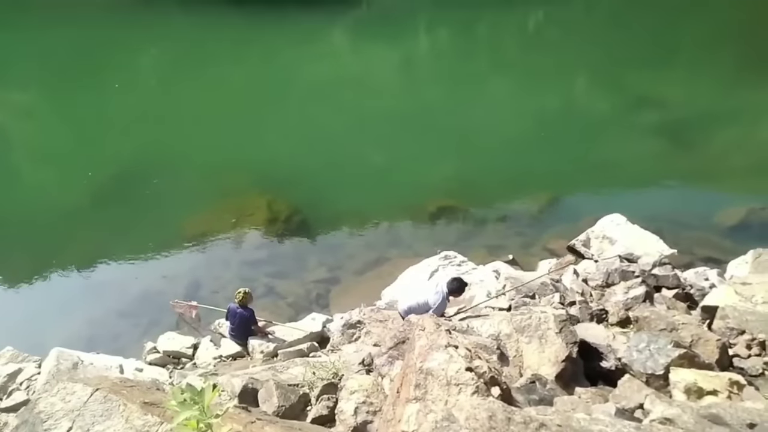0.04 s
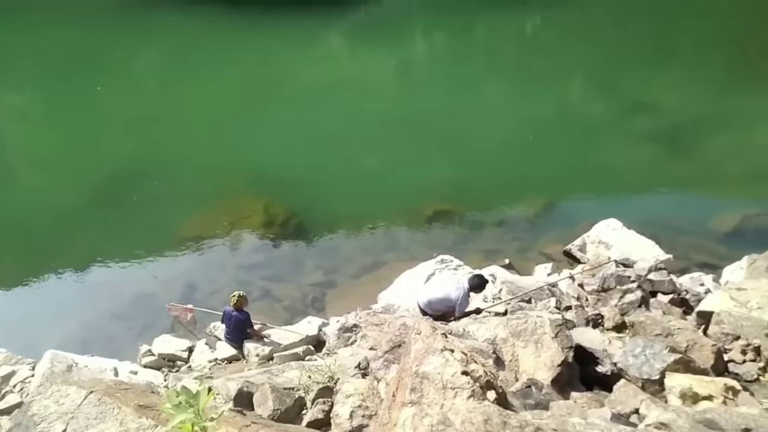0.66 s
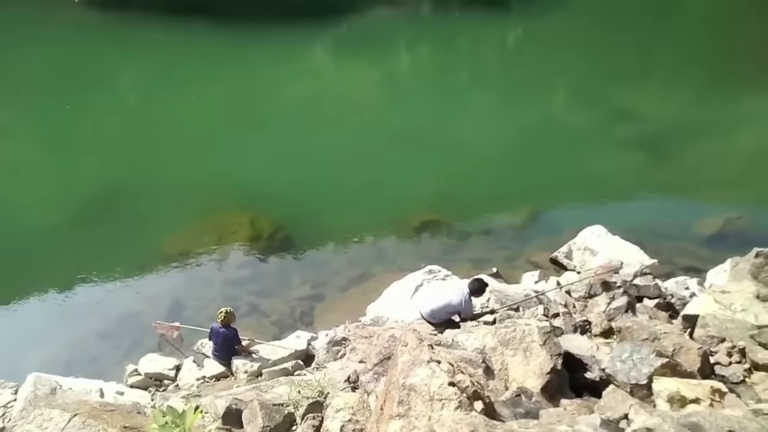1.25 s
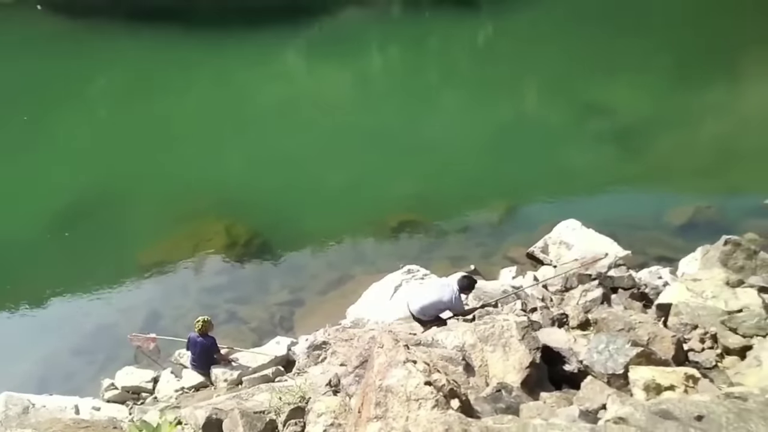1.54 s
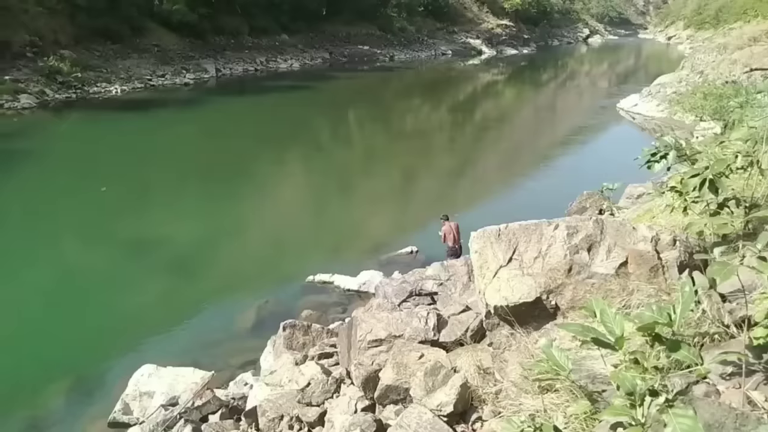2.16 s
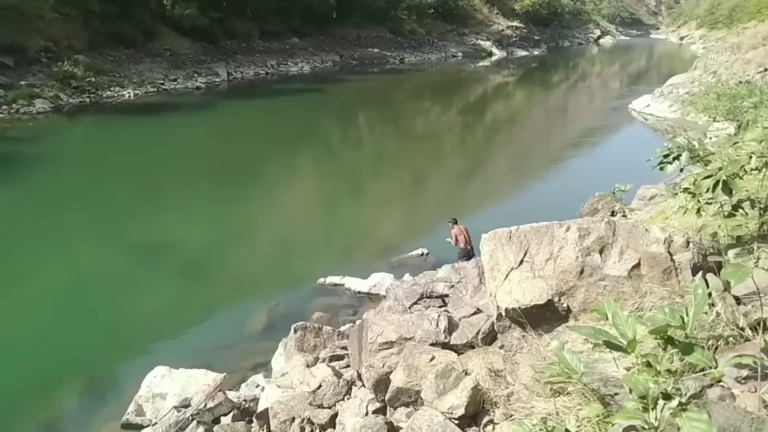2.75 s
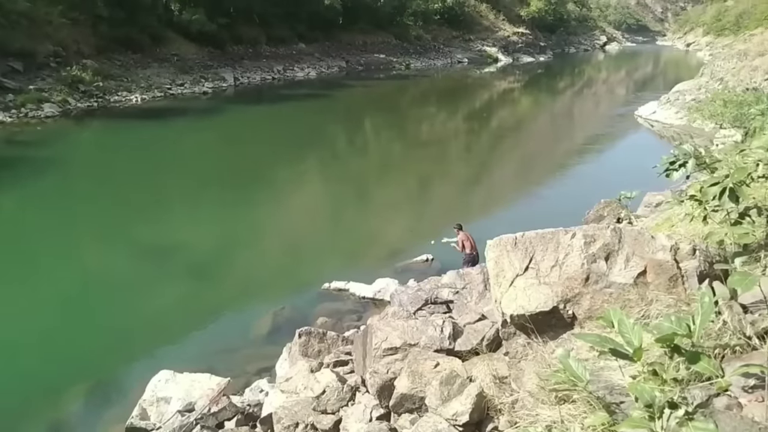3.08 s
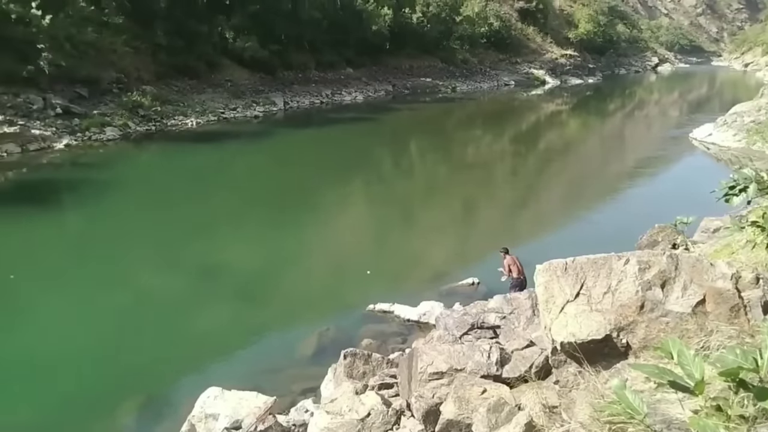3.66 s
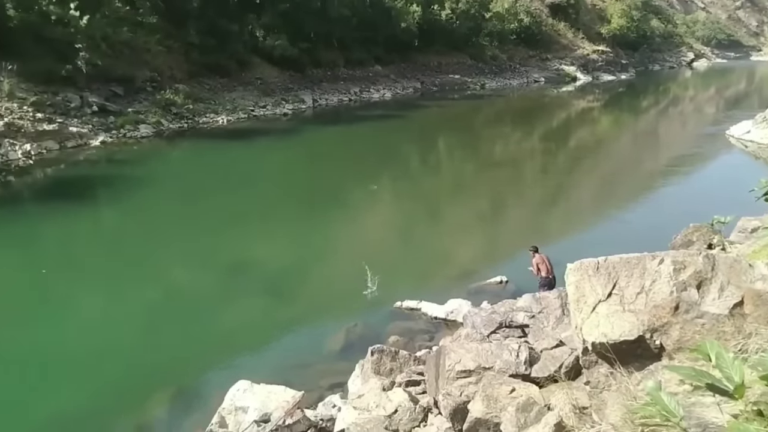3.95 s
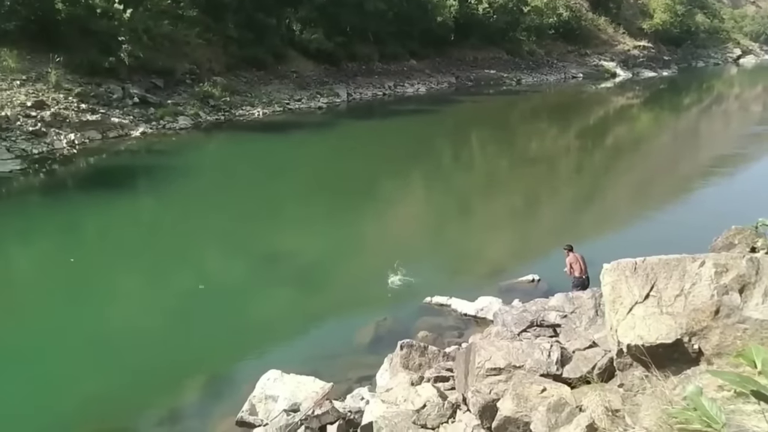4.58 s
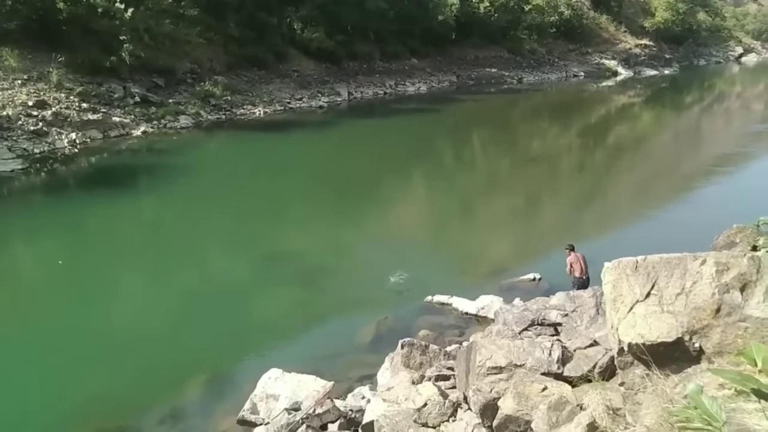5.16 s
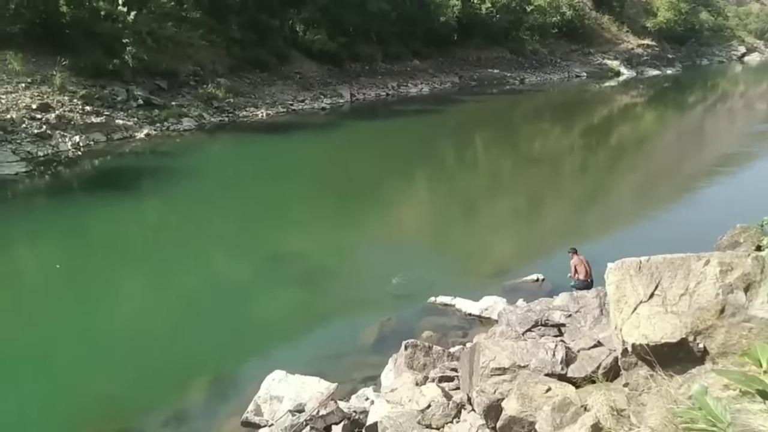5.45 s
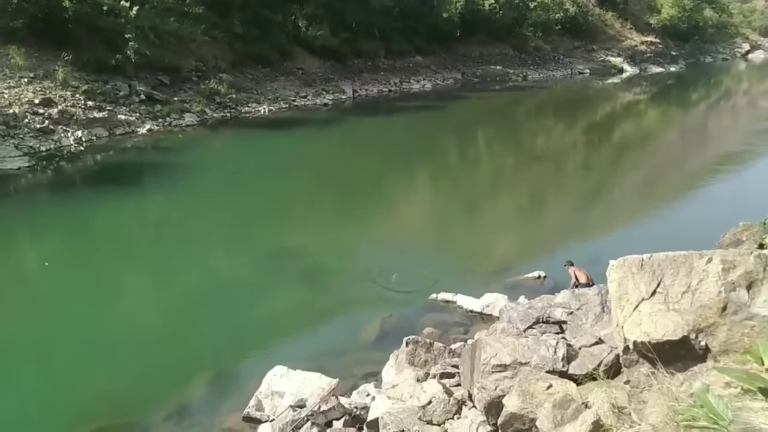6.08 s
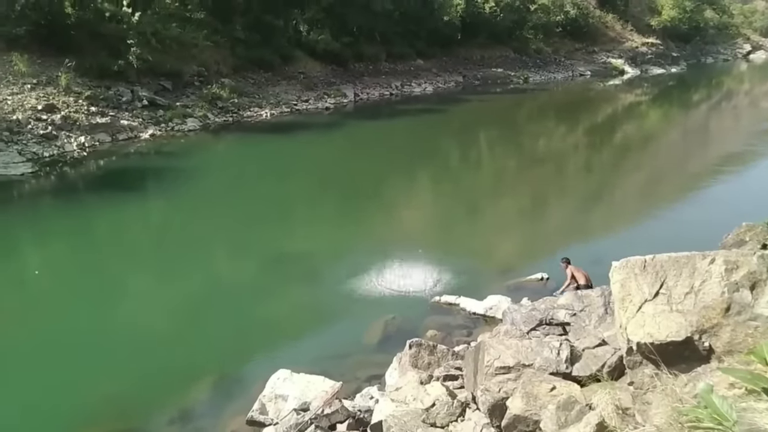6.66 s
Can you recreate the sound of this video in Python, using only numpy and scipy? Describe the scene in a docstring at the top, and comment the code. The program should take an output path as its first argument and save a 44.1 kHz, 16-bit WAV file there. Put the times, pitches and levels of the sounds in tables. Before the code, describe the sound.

Cicadas swell to a shrill, pulsing buzz over a rocky river, with a light breeze and a small tap on the microphone. The sound drops out briefly and returns with the insects farther off. A thrown charge plops faintly into the water and drops patter back. Then it explodes below the surface with a loud thump and crack, slightly overloading the microphone, followed by spray and a rumbling echo.

```python
"""Cicadas wind up to a shrill buzz in the trees over a rocky river gorge, their ribs buckling in fast pulses.
The sound drops away briefly and fades up at a second spot on the bank. A thrown charge plops into the
water and its splash patters back. Then it goes off below the surface: the ground shakes first,
the water cracks, the gas bubble bursts out, and spray and echoes die away."""
import sys
import numpy as np
from scipy import signal
from scipy.fft import rfft, irfft, next_fast_len
from scipy.io import wavfile
from scipy.ndimage import map_coordinates

SR = 44100
rng = np.random.default_rng(int(sys.argv[2]) if len(sys.argv) > 2 else 0)


def persist_wave(psi):
    """Save psi, clipped to +-1, as 16-bit WAV."""
    counts = np.round(np.clip(psi, -1, 1) * 32767).astype(np.int16)
    wavfile.write(sys.argv[1], SR, np.atleast_2d(counts).T)


N = 300968
TIME = np.arange(N) / SR
MOVE_S = 1.961   # from the first spot to the second


def from_db(db):
    """Decibels to gain."""
    return 10 ** (np.asarray(db) / 20)


def rms_one(x):
    """Scale to unit rms."""
    return x / np.sqrt(np.mean(x ** 2) + 1e-20)


def lowpass(x, hz, order=2):
    """Dull the top end."""
    return signal.sosfilt(signal.butter(order, hz, fs=SR, output="sos"), x + 1e-18)


def noise(colour):
    """Steady noise at rms 1, coloured by rows of frequency in Hz, relative level in dB."""
    hz, db = np.transpose(colour)
    size = next_fast_len(N)
    bins = np.maximum(np.arange(size // 2 + 1) * SR / size, 1)
    gain = from_db(np.interp(np.log(bins), np.log(hz), db)) * np.minimum(bins / hz[0], 1) ** 2
    return rms_one(irfft(rfft(rng.standard_normal(size)) * gain, size)[:N])


def drift(rate):
    """A random wander at rms 1, with `rate` turning points a second."""
    knots = rng.standard_normal(int(N / SR * rate) + 2)
    return rms_one(np.interp(TIME * rate, np.arange(len(knots)), knots))


def ring(drive, hz, t60):
    """A resonance: a unit click sets a sine of height 1 ringing."""
    r, w = 10 ** (-3 / (t60 * SR)), 2 * np.pi * hz / SR
    return signal.lfilter([0, np.sin(w)], [1, -2 * r * np.cos(w), r * r], drive + 1e-18)


def burst(start, rise, t60):
    """Envelope that climbs to 1 and dies away."""
    age = np.maximum(TIME - start, 0)
    return np.minimum(age / rise, 1) * np.exp(-np.log(1000) * np.maximum(age - rise, 0) / t60)


def swells(rows):
    """Envelope of bell-shaped swells whose powers add."""
    return np.sqrt(sum(from_db(db) ** 2 * np.exp(-((TIME - s) / half) ** 2) for s, db, half in rows))


def swing(start, db, hz, swell):
    """A struck mass swells into a few swings and settles."""
    age = np.maximum(TIME - start, 0)
    return from_db(db) * (age / swell * np.exp(1 - age / swell)) ** 2 * np.sin(2 * np.pi * hz * age)


def by_spot(first_db, second_db):
    """One gain before the move, another after it."""
    return from_db(np.where(TIME < MOVE_S, first_db, second_db))


def rocks(x, echo_db, sway_s=.00006, count=5):
    """Rocks and water add early echoes; their comb of peaks and dips shifts as the microphone sways."""
    out = x.copy()
    for delay in np.geomspace(.005, .021, count) * rng.uniform(.85, 1.15, count):
        at = (TIME - delay - sway_s * drift(0.906)) * SR
        out += from_db(echo_db) * map_coordinates(x, [at], order=3)
    return out


# The wash of open air. Each row: frequency in Hz, relative level in dB.
AIR_COLOUR = [(20, 10), (45, -1.5), (90, -6), (180, -8.5), (320, -10), (650, -6), (1100, -10), (2000, -14),
              (3000, -13), (8000, -22.5), (12500, -26), (15500, -21)]
# Puffs of wind and faint rustles. Each row: centre in seconds, level in dB, half length in seconds.
WIND_PUFFS = [(0.02, -57, 0.09), (0.23, -54, 0.03), (0.32, -59.5, 0.081), (4.74, -66, 0.08)]
RUSTLE_SWELLS = [(0.17, -70, 0.26), (1.7, -65.5, 0.084), (1.88, -68, 0.12), (5.2, -76.5, 0.14)]


def open_air():
    """Air over the river, a breeze rumbling on the microphone, and a little rustle."""
    air = by_spot(-61.5, -64) * noise(AIR_COLOUR)
    wind = np.hypot(by_spot(-88, -72.5), swells(WIND_PUFFS)) * from_db(2.8 * drift(9))
    rumble = noise([(20, 5.5), (65, -2.5), (130, -16.5), (400, -31.5), (1500, -63), (8000, -88)])
    rustle = noise([(200, -15), (350, -0.5), (550, -13.5), (2000, -10.5), (8000, -45)])
    return air + wind * rumble + from_db(3) * swells(RUSTLE_SWELLS) * rustle


def tymbal(buzz_hz, depth, wander):
    """Loudness of a cicada's ribs buckling: a train of sharp pulses at an unsteady rate."""
    cycle = np.cumsum(buzz_hz * (1 + wander * drift(8))) / SR % 1
    return 1 + depth * np.exp(-cycle / .1)


def chorus(colour, bands, pulses):
    """The pulsing blur of many cicadas, with narrow ringing bands that fade in and out."""
    out = rms_one(noise(colour) * pulses) * from_db(.4 * drift(30))
    for start, stop, hz, width, db in bands:
        t60 = np.log(1000) / (np.pi * width) * 0.71
        rasp = rng.standard_normal(N) * pulses
        band = ring(ring(rasp, hz, t60), hz, t60)
        fade = np.clip(np.minimum(TIME - start, stop - TIME) / 0.23, 0, 1)
        out += fade * from_db(db + 0.69 * drift(7)) * rms_one(band)
    return out


# The body of each chorus. Each row: frequency in Hz, relative level in dB.
NEAR_COLOUR = [(1530, -46), (2600, -33), (3130, -16.5), (3290, -6), (3490, -9), (3580, -22), (3990, -4.5),
               (4650, -6), (5060, -7.5), (5600, -6), (6250, 3.5), (7620, -8), (9290, -23.5), (10600, -22.5),
               (12000, -37.5), (15600, -61), (22000, -120)]
FAR_COLOUR = [(1530, -53), (2600, -29), (3090, -10.5), (3270, -13.5), (3420, -8), (3580, -7), (4260, -2.5),
              (4840, -8), (5460, -1.5), (5860, -1), (7280, -1.5), (9230, -17.5), (10700, -18),
              (12000, -24.5), (15600, -52), (22000, -120)]
# Narrow ringing bands in the cicada buzz that fade in and out.
# Each row: start and stop in seconds, pitch and rough width in Hz, level in dB against the chorus.
NEAR_BANDS = [(-0.5, 0.65, 5110, 430, -3.5), (-0.2, 0.7, 3820, 170, -12.5), (0.23, 0.62, 4380, 170, -12),
              (-0.5, 0.35, 6750, 300, -8), (0.7, 2.5, 3330, 88, -19.5), (0.43, 2.5, 4010, 69, -13.5),
              (0.4, 2.5, 4620, 180, -13.5), (0.4, 2.5, 5560, 120, -11.5), (0.3, 2.5, 5780, 120, -8),
              (0.4, 2.5, 6420, 130, -12.5), (0.4, 2.5, 7080, 110, -15), (0.2, 2.5, 7600, 83, -15.5),
              (0.7, 2.5, 8600, 70, -26.5)]
FAR_BANDS = [(1.5, 7.3, 3335, 85, -12), (3.9, 7.3, 4270, 100, -13), (1.5, 7.3, 5410, 83, -11.5),
             (3.3, 7.3, 5560, 57, -11), (1.5, 3, 5887, 44, -11.5), (1.5, 7.3, 6450, 230, -10.5),
             (4.2, 7.3, 7040, 100, -15), (1.5, 4.24, 7400, 130, -11), (1.5, 7.3, 8780, 230, -25)]


def cicadas(half_effort_s=0.335, wind_up_s=0.175, pitch_sag=0.06):
    """Near cicadas climb in level and pitch with their effort; the second spot hears a far chorus."""
    effort = 1 / (1 + np.exp((half_effort_s - TIME) / wind_up_s))
    speed = 1 - pitch_sag * (1 - effort ** 2)
    near = chorus(NEAR_COLOUR, NEAR_BANDS, tymbal(buzz_hz=109.5, depth=0.66, wander=.015))
    near = map_coordinates(near, [np.cumsum(speed)], order=3) * effort * from_db(-48.5)
    distant_hiss = from_db(-62) * noise(FAR_COLOUR)
    far_gain = from_db(-57 + 0.45 * drift(2.96))
    far = far_gain * chorus(FAR_COLOUR, FAR_BANDS, tymbal(buzz_hz=116.7, depth=0.58, wander=.002))
    return rocks(np.where(TIME < MOVE_S, near + distant_hiss, far), echo_db=-12.0)


# Taps on the microphone housing. Each row: time in seconds, strength in dB.
FINGER_TAPS = [(0.297, -44), (0.4801, -23)]
# The housing's ring. Each row: pitch in Hz, relative level in dB, t60 in seconds.
HOUSING_MODES = [(740, -2.5, 0.0075), (1210, -0.5, 0.0051), (2270, -3.5, 0.0034)]


def knocks(soft_hz=3600):
    """A fingertip taps the housing and its modes ring briefly."""
    taps = np.zeros(N)
    for start, db in FINGER_TAPS:
        taps[round(start * SR)] = from_db(db)
    taps = lowpass(taps, soft_hz, order=3)
    return sum((-1) ** k * from_db(db) * ring(taps, hz, t60)
               for k, (hz, db, t60) in enumerate(HOUSING_MODES))


def bubble(start, db, hz, cycles=28, glide=0.065):
    """A bubble rings briefly with rising pitch."""
    turns = hz * np.maximum(TIME - start, 0)
    tone = np.sin(2 * np.pi * turns * (1 + glide * turns / cycles))
    return from_db(db) * burst(start, 0.0022, cycles / hz) * tone


# Drops as the charge enters and its jet rises and falls back.
# Each row: centre in seconds, level in dB, half length in seconds.
DROP_SHOWERS = [(4.045, -61.5, 0.03), (4.219, -65, 0.09), (4.649, -62.5, 0.19)]
# Their patter. Each row: frequency in Hz, relative level in dB.
PATTER_COLOUR = [(200, -23), (500, -3), (800, 1), (1400, -2), (2300, -4.5), (4000, -7), (9000, -22),
                 (15000, -15)]
# Sharp slaps on the water. Each row: start in seconds, level in dB, t60 in seconds, low-pass in Hz.
WATER_SLAPS = [(3.89, -45, 0.028, 18000), (4.003, -47.5, 0.044, 4500), (4.03, -54, 0.098, 4500),
               (4.657, -51, 0.03, 5000)]
# Large bubbles. Each row: start in seconds, peak in dB, pitch in Hz.
BUBBLE_PLOPS = [(4.002, -46.5, 660), (4.034, -51.5, 834), (4.589, -53, 1130), (4.655, -49, 560),
                (4.658, -47.5, 790), (4.698, -51.5, 713), (4.762, -52, 756)]


def splash(bubbles_per_s=50, bubble_hz=882, spread_db=1.8, spread_octaves=0.497):
    """The charge lands: slaps, large plops, and showers of fine drops that leave small bubbles."""
    out = swells(DROP_SHOWERS) * noise(PATTER_COLOUR) * from_db(3.3 * drift(70))
    slap = noise([(400, -5.5), (750, 3), (1500, -5), (3200, 1.5), (9000, -15), (15000, -7.5)])
    for start, db, t60, top_hz in WATER_SLAPS:
        out += from_db(db) * burst(start, 0.00078, t60) * lowpass(slap, top_hz)
    for centre, db, half in DROP_SHOWERS:
        count = round(2 * half * bubbles_per_s)
        for when, size, pitch in rng.standard_normal((60, 3))[:count]:
            start = centre + half * when / np.sqrt(2)
            out += bubble(start, db + 4.5 + spread_db * size, bubble_hz * 2 ** (spread_octaves * pitch))
    return out + sum(bubble(*plop) for plop in BUBBLE_PLOPS)


# Dull thuds. Each row: start in seconds, peak in dB, pitch in Hz, swell in seconds.
# In order: the housing is nudged; the charge hits the water; its cavity closes; the blast comes
# through the ground; the surface lifts, then bursts; the bank shakes again; the gas bubble swells;
# the far wall answers.
THUDS = [(0.492, -35.5, 44.3, 0.013), (4.0, -41.5, 262, 0.0026), (4.002, -50, 107, 0.015),
         (6.319, -18.5, 97, 0.012), (6.3447, -4.5, 89, 0.005), (6.3504, -17.5, 196, 0.0039),
         (6.383, -21, 119, 0.0075), (6.437, -16.5, 30.3, 0.017), (6.575, -26.5, 164, 0.0057)]


def thumps():
    """Housing, water and ground each take a blow and swing a few times: the low-end weight."""
    return sum(swing(*thud) for thud in THUDS)


# Returns from the near bank and far wall. Each row: start in seconds, level in dB, rise and t60 in seconds.
WALL_RETURNS = [(6.345, -32, 0.01, 0.82), (6.48, -33, 0.098, 1.67)]
# Their dark roll. Each row: frequency in Hz, relative level in dB.
ECHO_COLOUR = [(18, -34), (30, -5), (124, -1), (194, -8), (280, -14.5), (311, -12.5), (404, -15),
               (512, -14.5), (1280, -21), (1430, -24), (1810, -24.5), (5040, -37), (7090, -49), (8520, -56),
               (16000, -54.5)]


def gorge_echo():
    """The blast rolls back from the rock as a fluttering rumble."""
    returns = [from_db(db) * burst(start, rise, t60) for start, db, rise, t60 in WALL_RETURNS]
    return np.linalg.norm(returns, axis=0) * noise(ECHO_COLOUR) * from_db(1.14 * drift(160))


# The surface breaks twice. Each row: start in seconds, spray level in dB, hollow ring in dB.
SURFACE_BREAKS = [(6.353, -38.5, -20), (6.4505, -38, -26.5)]
# The wash of spray. Each row: frequency in Hz, relative level in dB.
SPRAY_COLOUR = [(180, -45), (300, 0), (634, -6), (814, -5), (900, -3), (1170, -9), (1480, -5), (3240, -7.5),
                (4370, -13), (6960, -10.5), (9880, -22), (15000, -17), (16000, -13)]


def plume(rise_s=0.037):
    """Each break rings the cavity and throws up spray; a jet hisses out and fine mist hangs on."""
    cavity = sum(swing(start, db, hz=766, swell=0.0039) for start, _, db in SURFACE_BREAKS)
    hiss = noise([(2500, -25), (6500, 7), (10000, -9), (15000, -19)])
    jet = from_db(-29.5) * hiss * burst(6.4475, rise=0.00079, t60=0.039)
    thrown = [from_db(db) * burst(start, rise_s, t60=0.38) for start, db, _ in SURFACE_BREAKS]
    mist = from_db(-55.5) * burst(SURFACE_BREAKS[0][0], rise_s, t60=6.0)
    spray = np.linalg.norm(thrown + [mist], axis=0) * noise(SPRAY_COLOUR) * from_db(1.4 * drift(400))
    return cavity + rocks(jet + spray, echo_db=-16)


# Crack, main shock and venting. Each row: start in seconds, peak in dB, length in seconds.
SHOCK_PULSES = [(6.349, -7.5, 0.00046), (6.3502, -8.5, 0.003), (6.453, -17.5, 0.00137)]
# Their bounces off the river bed. Each row: delay in seconds, relative level in dB.
BED_BOUNCES = [(0.0066, -2), (0.0106, -7), (0.02, -14)]


def shocks(edge_hz=4200, bed_hz=950):
    """N-shaped pressure pulses, rounded on the way out of the water; the bed sends them back duller."""
    def path(delay, top_hz):
        """The pulses along one path."""
        out = np.zeros(N)
        for start, db, length in SHOCK_PULSES:
            phase = (TIME - start - delay) / length
            out += from_db(db) * (1 - 2 * phase) * ((phase >= 0) & (phase < 1))
        return lowpass(out, top_hz)
    return path(0, edge_hz) + sum(from_db(db) * path(delay, bed_hz) for delay, db in BED_BOUNCES)


# The torn surface and the venting bubble. Each row: frequency in Hz, relative level in dB.
CRACK_COLOUR = [(150, -8.5), (280, 3.5), (400, 0), (540, -1.5), (760, 1.5), (1000, -20), (1500, -23),
                (1950, -11.5), (2700, -26), (5000, -24.5), (7500, -29), (11000, -42), (15000, -35)]
VENT_COLOUR = [(120, -34), (200, -9), (334, -12), (821, -3), (1560, -24.5), (2170, -12), (2510, -31),
               (2960, -11), (3490, -13), (3830, -15), (5130, -22.5), (6280, -17), (11300, -33),
               (12400, -29), (16000, -25)]


def blast():
    """The water heaves and the shock tears it open; a tenth of a second later the gas bubble vents."""
    dull_roar = noise([(200, 0), (850, 2), (2000, -24), (8000, -50)])
    heave = from_db(-30) * dull_roar * burst(6.338, rise=0.0081, t60=0.056)
    crack = from_db(-16) * noise(CRACK_COLOUR) * burst(6.3465, rise=0.0042, t60=0.07)
    vent = from_db(-21.5) * noise(VENT_COLOUR) * burst(6.447, rise=0.0078, t60=0.065)
    return shocks() + heave + crack + vent


def scene():
    """Everything at the microphone, in mono."""
    background = cicadas() + open_air() + knocks()
    return (background + splash() + thumps() + blast() + plume() + gorge_echo())[None]


def bias_settling(start=2.108, db=-27.0, hz=2.03, t60=0.88):
    """Back on, the microphone's bias settles with one slow swing."""
    age = np.maximum(TIME - start, 0)
    return from_db(db - 60 * age / t60) * np.sin(2 * np.pi * hz * age)


def record(dry, ceiling=0.34, fade_start_s=1.979, fade_s=0.25, cutoff_hz=15800):
    """The level drops at the move and fades up, the blast overloads the microphone, the top is cut."""
    fade_up = np.clip((TIME - fade_start_s) / fade_s, from_db(-33), 1)
    gain = np.where(TIME < MOVE_S, 1, fade_up)
    squashed = ceiling * np.tanh((dry * gain + bias_settling()) / ceiling)
    return signal.sosfilt(signal.ellip(10, .1, 70, cutoff_hz, fs=SR, output="sos"), squashed)


dry = scene()
out = record(dry)
persist_wave(out)
```